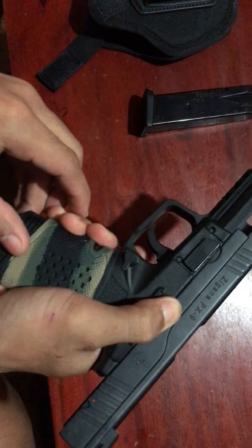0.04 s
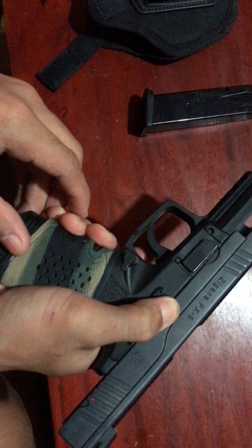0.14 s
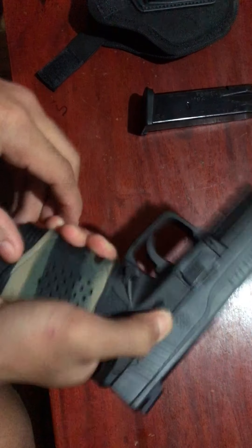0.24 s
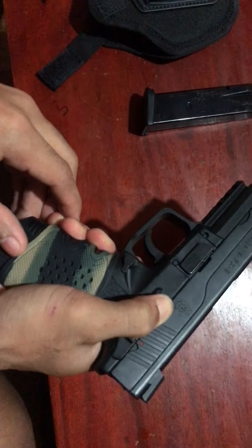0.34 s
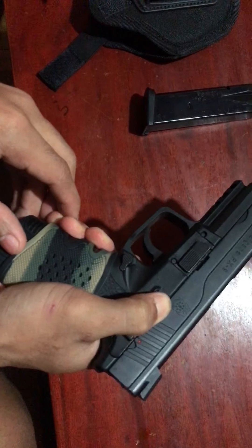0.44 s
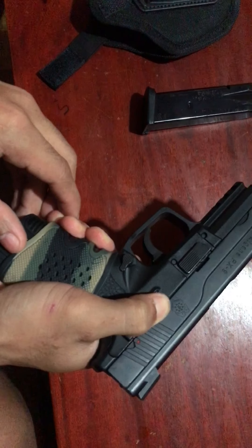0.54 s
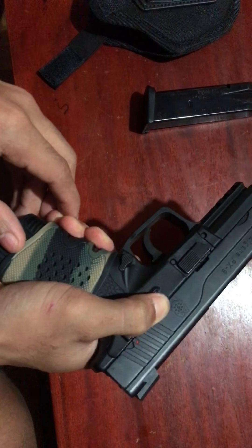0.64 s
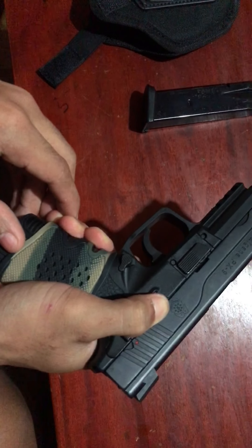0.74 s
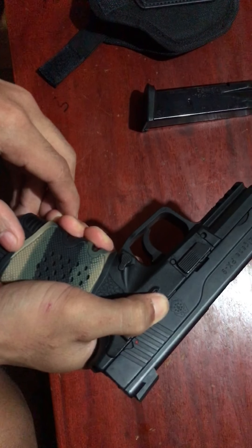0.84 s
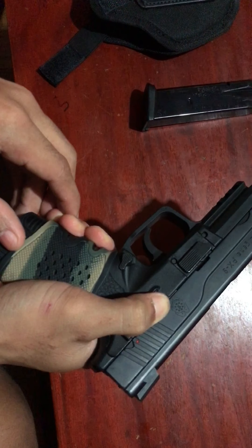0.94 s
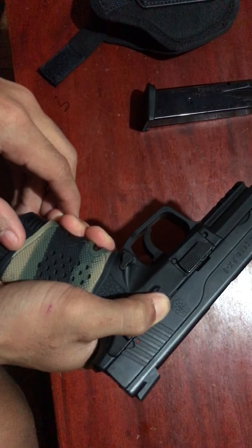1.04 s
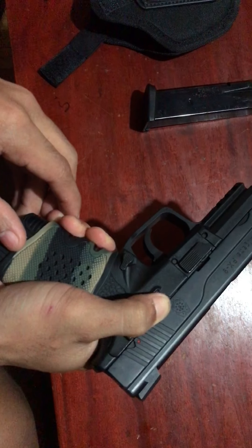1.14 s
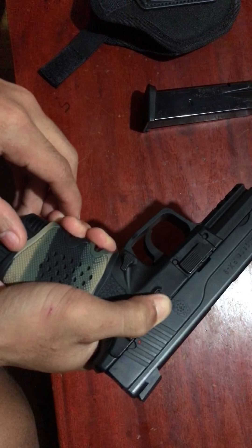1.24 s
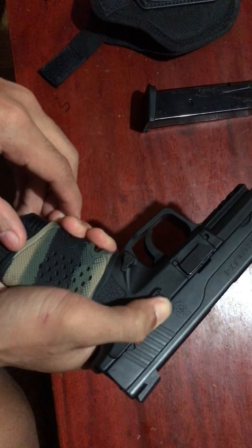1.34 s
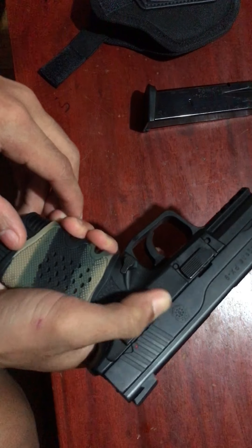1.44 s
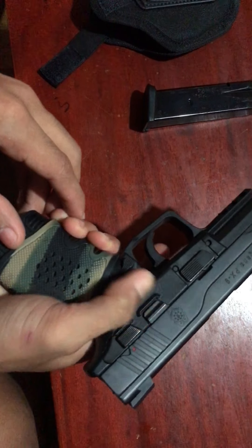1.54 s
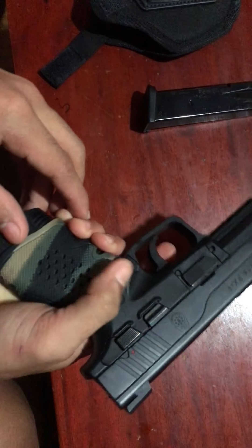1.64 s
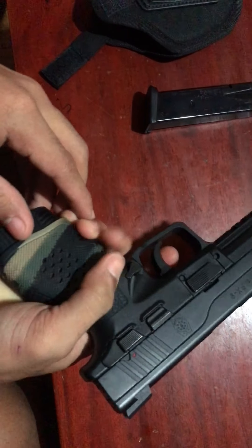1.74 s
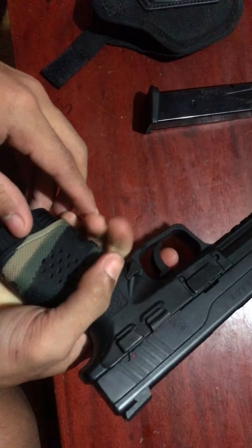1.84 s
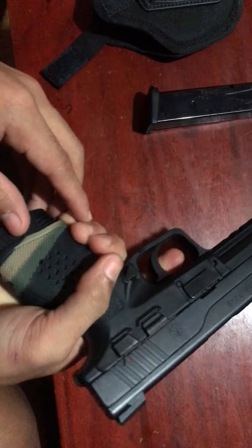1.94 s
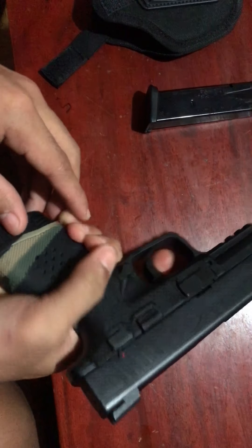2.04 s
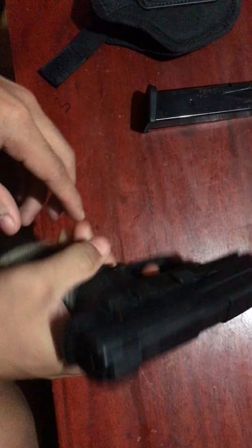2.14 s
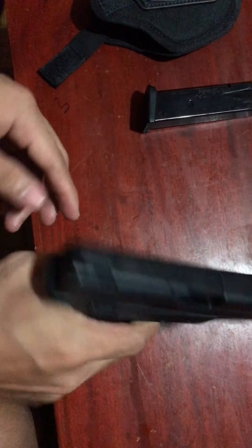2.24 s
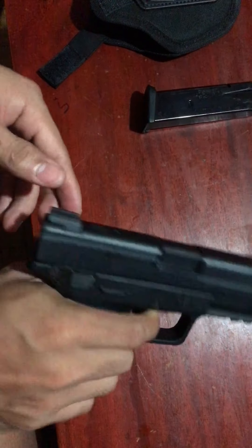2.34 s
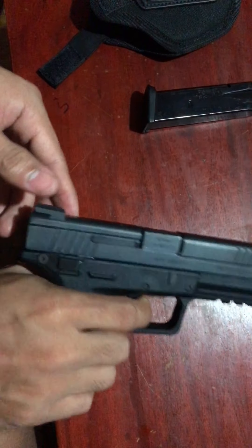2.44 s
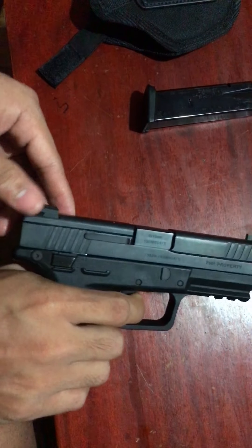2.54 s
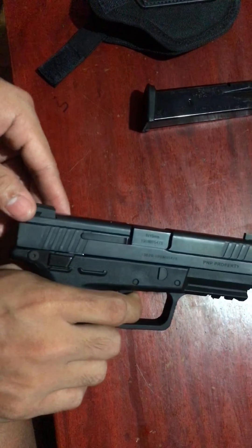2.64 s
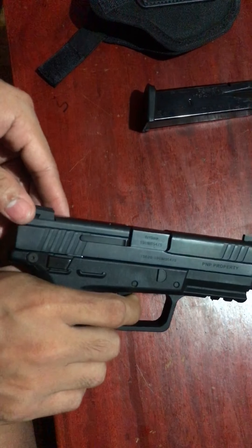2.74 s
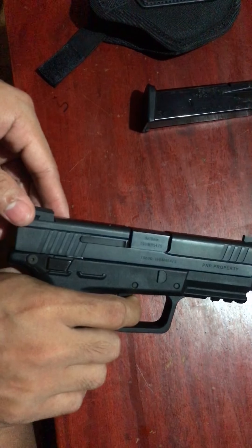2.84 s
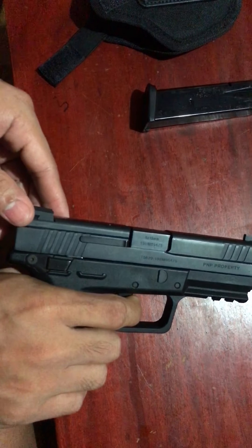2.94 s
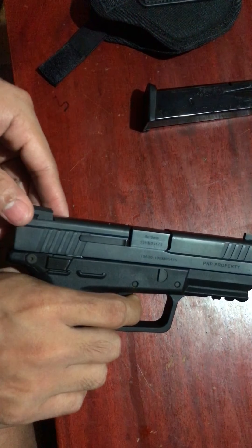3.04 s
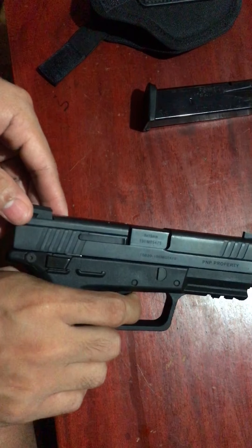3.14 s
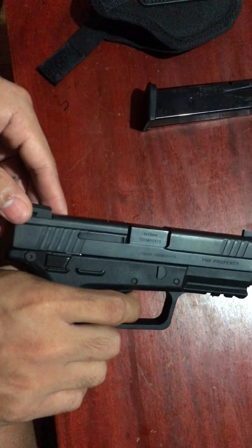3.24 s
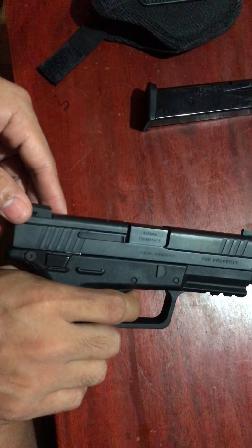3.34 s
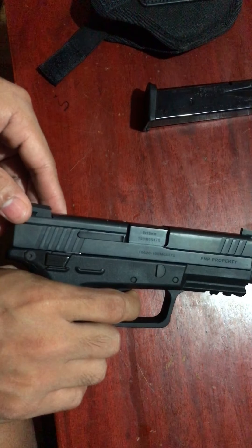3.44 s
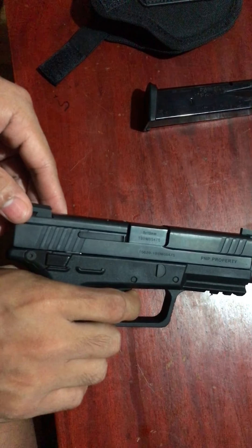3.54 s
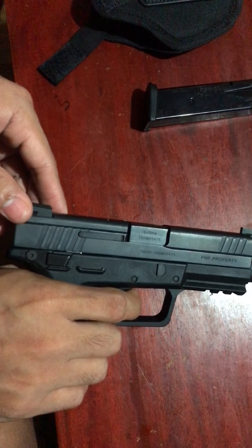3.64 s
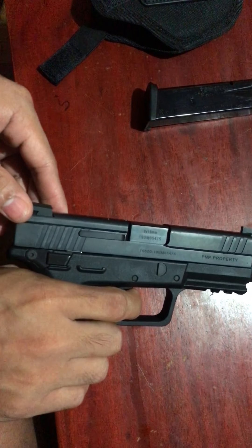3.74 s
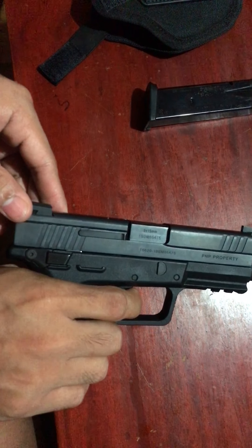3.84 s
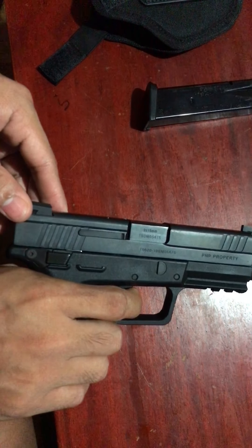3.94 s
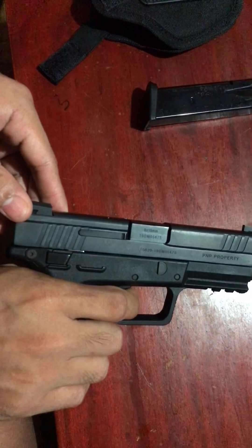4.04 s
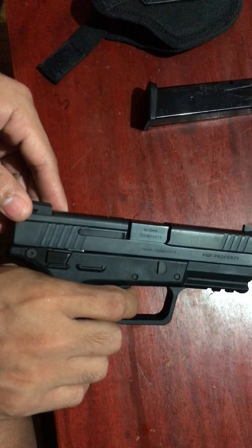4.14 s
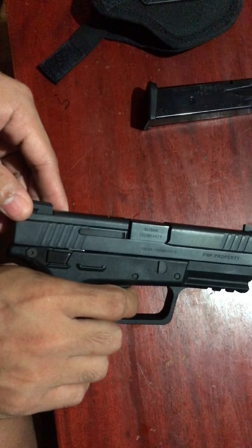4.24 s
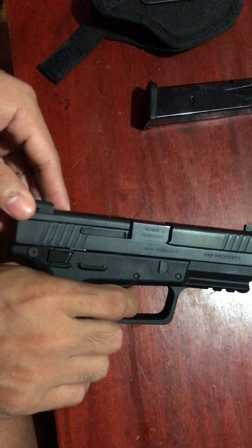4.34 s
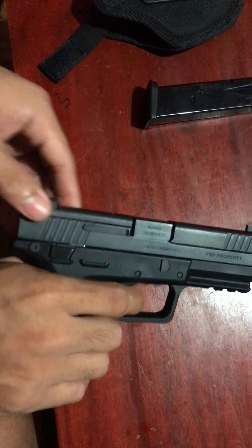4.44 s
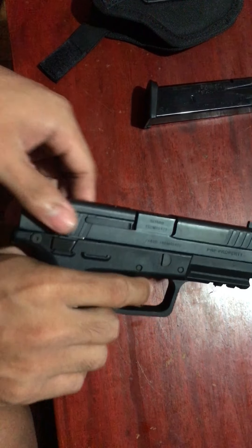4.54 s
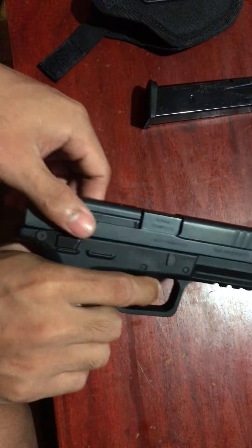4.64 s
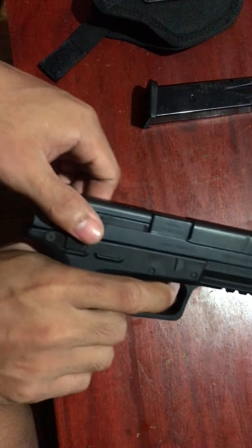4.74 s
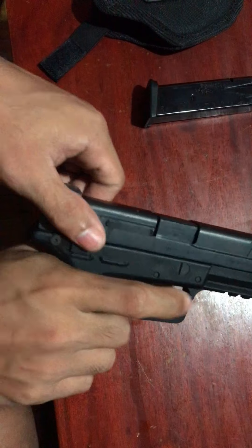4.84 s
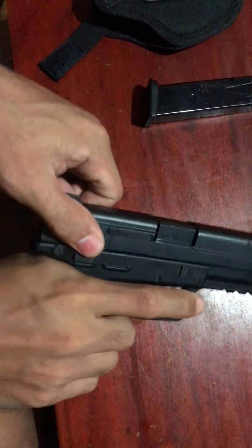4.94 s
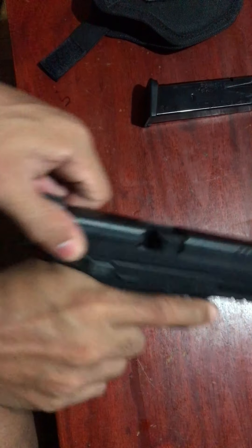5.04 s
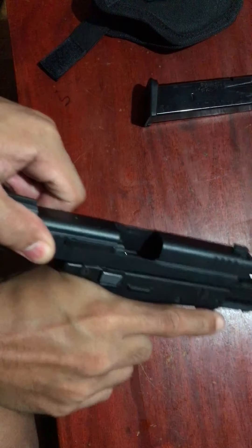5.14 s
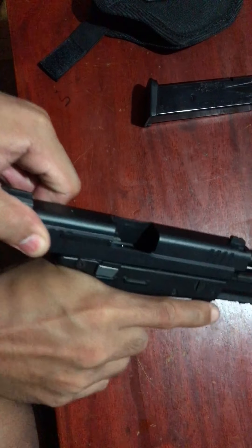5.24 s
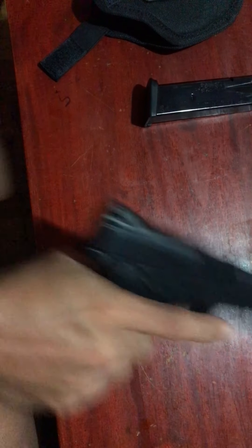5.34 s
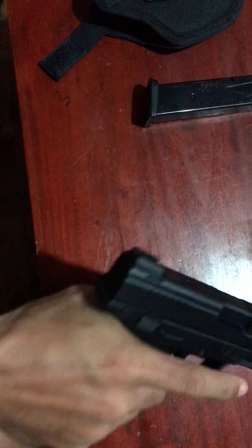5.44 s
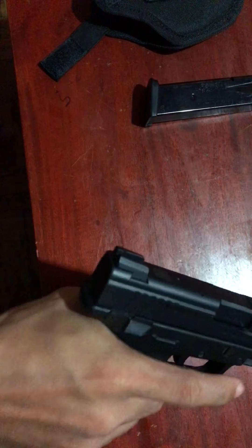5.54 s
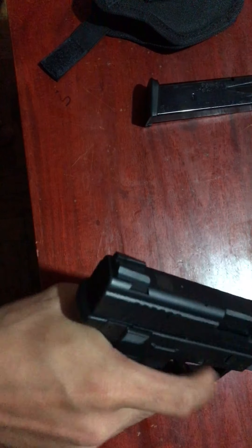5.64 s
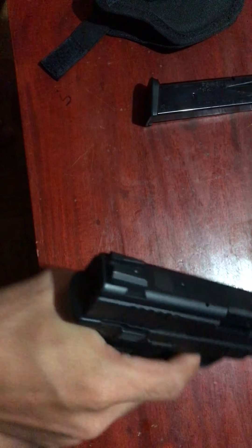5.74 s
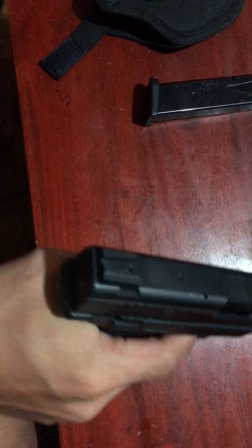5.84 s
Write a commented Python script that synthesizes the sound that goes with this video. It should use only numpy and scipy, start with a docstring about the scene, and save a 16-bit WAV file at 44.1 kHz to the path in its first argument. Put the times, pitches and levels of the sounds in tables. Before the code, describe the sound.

A pistol slide slams shut with a loud metallic clack, later a dry-fire click and hand racking, over fan hum and rumbling microphone buffeting.

```python
"""A steel pistol slide slams shut, is dry-fired and racked by hand over a wooden table, close to a phone.
Each metal blow is a burst of rattling noise plus ringing sine tones; rubbing, ticks and brushes are noise.
Knocks on the table are low, quickly fading tones with a dull rattle. A fan hums in the small room, and from
about the third second its draught buffets the microphone port, as rumbling noise and short swings.
The phone's gain control turns the sound down after each loud slam and lets it climb back."""
import sys
import numpy as np
from scipy import signal
from scipy.fft import rfft, irfft, next_fast_len
from scipy.io import wavfile
from scipy.ndimage import uniform_filter1d

SR = 44100
rng = np.random.default_rng(int(sys.argv[2]) if len(sys.argv) > 2 else 0)


def to_wav(sig):
    """Store sig (one row per channel, or 1-D mono) as 16-bit WAV at the path in sys.argv[1].

    Samples outside -1..1 are clipped; the rate is SR.
    """
    pcm = np.clip(np.atleast_2d(sig), -1, 1) * 32767
    pcm = np.round(pcm).astype(np.int16)
    wavfile.write(sys.argv[1], SR, pcm.T)  # frames by channels


N = 260190  # samples in the scene

# Fan motor and blades, slightly blurred tones: pitch_hz, width_hz, level_db
FAN_TONES = [(59.4, 3, -61.5), (121, 8, -74.5), (175, 10, -66), (238, 7, -59.5), (367.4, 8, -66.5),
             (634, 49, -68), (3797, 140, -68)]
# Swell of the lowest fan tone: time_s, gain_db
FAN_SWELL = [(1.2, -0.5), (1.6, 4), (2.6, 7.5), (3, 1.5)]
# Colour of the fan's air noise: pitch_hz, level_db (relative, per Hz)
AIR_COLOUR = [(20, -22.5), (40, -4.5), (100, -4), (300, -3), (470, -11.5), (630, -7.5), (1000, -3.5),
              (1700, -3), (2600, -10), (3400, -16.5), (4400, -20), (7000, -26), (10400, -33.5),
              (16000, -31)]
AIR_DB = -53.5  # middle level, before slow wavering

# Strength of the draught at the microphone port: time_s, level_db
DRAUGHT_LEVEL = [(2.93, -63), (2.97, -39.5), (3.31, -31), (3.46, -36), (3.63, -32.5), (3.69, -43.5),
                 (3.74, -30), (4.08, -35), (4.33, -33.5), (4.38, -53), (4.42, -35.5), (4.74, -44.5),
                 (4.81, -36), (5.04, -33.5), (5.28, -45.5), (5.55, -45), (5.72, -46.5), (5.9, -36)]
# Strongest eddies thudding on the port: middle_s, level_db
STRONG_EDDIES = [(3.116, -33.5), (3.194, -24.5), (3.217, -13), (3.276, -22.5), (3.301, -17), (3.364, -18.5),
                 (3.376, -21.5), (3.505, -24.5), (3.523, -22), (3.616, -18), (3.633, -10.5), (3.658, -20),
                 (3.737, -20), (3.757, -20), (3.788, -17.5), (3.839, -17.5), (3.868, -20.5), (3.927, -22),
                 (3.994, -21), (4.145, -18.5), (4.205, -19.5), (4.218, -19), (4.258, -20.5), (4.413, -26.5),
                 (4.454, -23.5), (4.519, -25.5), (4.643, -27.5), (4.794, -23.5), (4.916, -26),
                 (5.003, -25.5), (5.172, -26.5), (5.544, -31), (5.832, -28.5)]
# Colour of the slow rumble: pitch_hz, level_db (relative, per Hz)
RUMBLE_COLOUR = [(20, -31), (45, -2), (80, 1), (120, -9), (200, -21), (400, -77)]
# Colour of the small swirls: pitch_hz, level_db (relative, per Hz)
SWIRL_COLOUR = [(60, -10.5), (130, 5), (280, -11.5), (450, -16), (700, -34.5), (1400, -78)]
EDDY_HZ, EDDY_RISE, EDDY_SPREAD = 202, 0.0399, .3  # pitch at -24 dB; octaves up per dB; octaves of chance
SMALL_COUNT = 24  # weaker eddies at chance moments
SMALL_DB, SMALL_SPREAD_DB = 1, 0.5  # above the draught level; range of chance

# How long the room's reflections last: pitch_hz, t60_s (time to fall 60 dB)
ROOM_DECAY = [(1200, 0.17), (4000, 0.18), (9000, 0.1), (16000, 0.18)]

# The pistol knocks table and phone: start_s, level_db
TABLE_KNOCKS = [(0.246, -6), (0.365, -36.5), (5.342, -10.5)]
# Low tones of the table: pitch_hz, level_db (relative to the knock), t60_s, delay_s
TABLE_TONES = [(55, 3, 0.08, 0.0052), (146, -11, 0.08, 0)]
# Colour of the table top's dull rattle: pitch_hz, level_db (relative, per Hz)
BOARD_COLOUR = [(150, -20.5), (300, 0), (800, -4.5), (1100, -25)]
BOARDS_DB, BOARDS_T60 = -21, 0.18  # relative to the knock; seconds to fall 60 dB

# Metal hitting metal: start_s, level_db (relative), pitch_hz (part that rings most),
# decay_ms (rattle), ring_db (relative)
METAL_BLOWS = [(.2255, -25.5, 8000, 2.5, -10.5), (0.2307, 9, 4000, 3.2, -12), (0.2346, -1.5, 1770, 2.8, -5),
               (0.2439, 0, 3760, 10.5, -11), (0.2481, 9.5, 14200, 17, -12), (0.2526, 6, 1140, 7.1, -4),
               (0.2602, 5.5, 9600, 16.9, -11.5), (0.2816, -6, 9460, 7, 0.5), (4.0234, -34, 10800, 2.7, -16),
               (4.0355, -42, 8900, 2, -23), (4.0434, -14.5, 1110, 1.5, 4), (4.045, 3.5, 9900, 4.1, -11),
               (4.0513, 0, 4400, 2.95, -6.5), (4.0617, -12, 4400, 11, -9), (4.9954, -25.5, 8900, 2.8, -4.5),
               (4.9975, -20.5, 5700, 4.2, 3), (5.0187, -4, 5830, 2.5, -7.5), (5.0285, -8, 15650, 2.2, 2),
               (5.0309, 3.5, 6500, 2.7, -13), (5.0494, 7, 4000, 1.5, -16), (5.058, -12, 5900, 0.95, 5),
               (5.0643, -6.5, 6980, 2, -0.5), (5.111, -21, 5900, 3.6, 2.5), (5.118, -14, 1453, 3.7, -7.5),
               (5.306, -21.5, 3880, 2.7, 12.5), (5.3177, -24.5, 9050, 2.7, 2.5),
               (5.3358, -0.5, 2240, 8, -9.5), (5.3402, 10.5, 12500, 5.9, -13), (5.3458, -8, 1140, 4.4, 2.5),
               (5.354, 3, 14700, 9.7, -7.5), (5.363, -7.5, 8700, 24.3, -16)]
# Ringing modes of slide, barrel and frame: pitch_hz, level_db (relative), t60_s (slow part, not held)
STEEL_MODES = [(1150, 8, 0.088), (1730, -2, 0.059), (2292, -3.5, 0.043), (3100, -4.5, .05),
               (3880, -1, 0.034), (4330, -4.5, 0.051), (5900, 2, .16), (7000, 1, 0.098), (8420, -6.5, .07),
               (8980, -1, .16), (9280, -5, .33), (9590, -4.5, .2), (10950, -5, .06), (13240, -5, .06),
               (16460, -2, .05), (15650, -5, .15)]
# Colour of metal cracking and rubbing: pitch_hz, level_db (relative, per Hz)
CRACK_COLOUR = [(300, -42), (850, -20.5), (1020, -5.5), (2000, -0.5), (4300, -6), (5000, -8.5),
                (9500, -7.5), (10300, -18.5), (12500, -14.5), (16000, -12.5)]
# The slide rubs along its rails: start_s, end_s, start_level_db, end_level_db
RAIL_STROKES = [(0.202, 0.233, -69, -29.5), (5.018, 5.122, -54, -36.5), (5.291, 5.348, -57.5, -14)]
# Skin and cloth brush the grip: middle_s, length_s, level_db
GRIP_BRUSHES = [(1.603, 0.039, -67.5), (2.1, 0.062, -68.5), (3.332, 0.063, -75.5), (4.596, .12, -74)]
# Faint ticks as the hands shift on the pistol: start_s, level_db, pitch_hz (middle), width_octaves
HAND_TICKS = [(1.7602, -54, 5400, 1.3), (2.4516, -56, 6000, 1.4), (2.8163, -43, 3500, .9),
              (4.455, -42, 2100, .5), (4.523, -48, 1600, .7)]
# A thin tone as the spring takes load: middle_s, half_length_s, pitch_hz, level_db
SPRING_TONE = (4.96, .045, 1005, -45)
# A hand rests on the slide: start_s, end_s
HAND_ON_SLIDE = (1, 5.2)
TILT_DB = 2.5  # dB per octave of brightness, for each octave the struck part lies above 4 kHz
FRAME_DB = -13  # every blow shakes the frame, the lowest mode, at least this much
RADIATES_HZ = 946  # the small steel parts send little sound below this
TICK_MS = 4  # decay of a hand tick

MIC_LOW_HZ = 32  # bass limit of the microphone
EDGE_HZ = 15850  # pitch above which the sound holds no treble
CEILING = .86  # where peaks round off


def amp(db):
    """Turn decibels into a multiplier."""
    return 10 ** (np.asarray(db) / 20)


def evened(x):
    """Scale a sound to an average strength (rms) of 1."""
    return x / np.sqrt(np.mean(x ** 2) + 1e-20)


def read(points, hz):
    """Read a table between its pitches, on a logarithmic pitch scale."""
    point_hz, value = np.transpose(points)
    return np.interp(np.log(hz + 1), np.log(point_hz + 1), value)


def add(mix, s, sound):
    """Lay a sound into the mix, starting at s seconds."""
    part = mix[round(s * SR):][:len(sound)]
    part += sound[:len(part)]


def noise(colour_db, count=N):
    """Noise of rms 1; colour_db gives the level for each frequency."""
    size = next_fast_len(count)
    gain = amp(colour_db(np.fft.rfftfreq(size, 1 / SR)))
    spectrum = rfft(rng.standard_normal(size)) * gain
    return evened(irfft(spectrum, size)[:count])


def lumps(ms):
    """A random curve of rms 1, smoothed twice over ms milliseconds."""
    size = round(ms * SR / 1000)
    smooth = uniform_filter1d(rng.standard_normal(N), size)
    return evened(uniform_filter1d(smooth, size))


def fan():
    """Moving air makes broad noise; motor and blades make tones that waver."""
    t = np.arange(N) / SR
    out = amp(AIR_DB + 0.87 * lumps(60)) * noise(lambda f: read(AIR_COLOUR, f))
    swell = amp(np.interp(t, *np.transpose(FAN_SWELL)))
    for k, (hz, width, db) in enumerate(FAN_TONES):
        # slow complex noise blurs the tone to its width
        r = np.exp(-np.pi * width / SR)
        chance = rng.standard_normal(N) + 1j * rng.standard_normal(N)
        waver = signal.lfilter([1], [1, -r], chance)
        steady = 2.5 if k == 0 else .4  # the lowest tone wavers least, and swells
        tone = (steady * np.std(waver) + waver) * np.exp(2j * np.pi * hz * t)
        out += evened(tone.real) * amp(db) * (swell if k == 0 else 1)
    return out


def draught():
    """Turbulence makes a lumpy rumble; each eddy is a short swing with a kink, in a wake of small swirls."""
    level_db = np.interp(np.arange(N) / SR, *np.transpose(DRAUGHT_LEVEL), -120)
    rumble = evened(noise(lambda f: read(RUMBLE_COLOUR, f)) * amp(3.7 * lumps(7.7)))
    out = amp(level_db) * rumble

    # one weaker eddy at a chance moment in each equal slice of time
    when, size = rng.random((SMALL_COUNT, 2)).T
    first_s = DRAUGHT_LEVEL[0][0]
    small_s = first_s + (np.arange(SMALL_COUNT) + when) * (N / SR - first_s) / SMALL_COUNT
    small_db = np.interp(small_s, *np.transpose(DRAUGHT_LEVEL))
    small_db = small_db + SMALL_DB + SMALL_SPREAD_DB * (size - .5)
    eddies = STRONG_EDDIES + list(zip(small_s, small_db))

    wake, bump_s = np.zeros(N), np.arange(-1500, 1500) / SR
    for (s, db), chance in zip(eddies, rng.random((len(eddies), 3))):
        octaves = EDDY_RISE * (db + 24) + EDDY_SPREAD * (chance[2] - .5)
        hz = EDDY_HZ * 2 ** octaves
        turns = np.arange(-3, 3, hz / SR)
        swing = np.exp(-(turns / .7) ** 2) * np.cos(2 * np.pi * (turns + chance[0]))
        kink = np.exp(-(turns / 0.34) ** 2) * np.cos(2 * np.pi * (1.826 * turns + chance[1]))
        kink_db = -6.0 + 0.14 * (db + 20.0)  # strong eddies are sharper
        add(out, s - 3 / hz, amp(db) * (swing + amp(kink_db) * kink))
        add(wake, s + bump_s[0], amp(db - 15) * np.exp(-(bump_s / 0.015) ** 2))
    swirls = evened(noise(lambda f: read(SWIRL_COLOUR, f)) * amp(3.7 * lumps(3.7)))
    return out + (wake + amp(level_db - 4.5)) * swirls


def room(x):
    """Dense reflections, each band dying at its own speed, over a faint slower tail."""
    taps = rng.standard_normal(SR // 2)
    taps[:130] = 0  # a short gap before the reflections
    hz, t, bands = signal.stft(taps, SR, nperseg=128)
    decay_db = -60 * t / read(ROOM_DECAY, hz)[:, None]
    late_db = -27 - 60 * t / .4
    tail = signal.istft(bands * (amp(decay_db) + amp(late_db)), SR, nperseg=128)[1]
    return signal.fftconvolve(x, tail / np.linalg.norm(tail))[:N]


def table():
    """A knocked table gives low, damped tones with a soft start, and a dull rattle."""
    out, t = np.zeros(N), np.arange(9000) / SR
    soft_start = np.minimum(t / 0.0014, 1)
    for s, db in TABLE_KNOCKS:
        boards = noise(lambda f: read(BOARD_COLOUR, f), count=len(t)) * soft_start
        add(out, s, amp(db + BOARDS_DB - 60 * t / BOARDS_T60) * boards)
        for hz, mode_db, t60, later in TABLE_TONES:
            tone = np.sin(2 * np.pi * hz * t) * soft_start
            add(out, s + later, -amp(db + mode_db - 60 * t / t60) * tone)
    return out


def tick(db, hz, octaves):
    """A shifting hand makes a short damped click of noise with a soft start."""
    t = np.arange(1500) / SR
    click = noise(lambda f: -8.7 * (np.log2((f + 1) / hz) / octaves) ** 2, count=len(t))
    return amp(db) * click * np.exp(-t * 1000 / TICK_MS) * np.minimum(t / .001, 1)


def steel_colour(hz, near_hz, tilt_db):
    """Damped by the hand, each mode is a broad hump on the crack, raised near the struck part."""
    mode_hz, db, _ = np.transpose(STEEL_MODES)[:, :, None]
    hump_width = 60 + 0.0076 * mode_hz
    humps = (amp(db + 5.0) / (1 + ((hz - mode_hz) / hump_width) ** 2)).max(0)
    octaves = np.log2(np.maximum(hz, 1000)) - np.log2([[near_hz], [4000]])
    near_db = 6 * np.exp(-(octaves[0] / .45) ** 2)
    return read(CRACK_COLOUR, hz) + 20 * np.log10(1 + humps) + near_db + tilt_db * octaves[1]


def blow(s, level_db, near_hz, ms, ring_db):
    """A grainy rattle of parts, and the modes near the struck part ringing on unevenly."""
    held = HAND_ON_SLIDE[0] < s < HAND_ON_SLIDE[1]
    t = np.arange(7200 if held else 14000) / SR
    grain = amp(3.2 * evened(uniform_filter1d(rng.standard_normal(len(t)), 14)))
    tilt_db = TILT_DB * np.log2(near_hz / 4000)
    rattle = noise(lambda f: steel_colour(f, near_hz, tilt_db), count=len(t))
    rattle *= grain * np.exp(-t * 1000 / ms) * np.minimum(t / 0.00025, 1)

    hz, db, t60 = np.transpose(STEEL_MODES)[:, :, None]
    t60 = t60 * (.6 if held else 1)
    slow = t[::40]  # slow changes are worked out every 40 samples
    # loose parts blur each pitch: a random start, then a random walk
    walk = np.cumsum(rng.standard_normal((len(hz), len(slow))), 1)
    stray = rng.random(hz.shape) + .0016 * np.sqrt(hz) * walk
    turns = (hz * t + stray.repeat(40, 1)) % 1
    share_db = db - np.minimum(40 * abs(np.log2(hz / near_hz)), 20.5)
    share_db[0] = max(share_db[0, 0], FRAME_DB - ring_db)
    # the grip damps most at once; a weaker part rings longer
    decay = amp(share_db - 200 * slow / t60) + amp(share_db - 15 - 60 * slow / t60)
    ring = (decay.repeat(40, 1) * np.sin(2 * np.pi * turns.astype(np.float32))).sum(0)
    ring *= np.minimum(t / 0.0002, 1) * np.minimum((t[-1] - t) / .05, 1)
    return amp(level_db) * (0.32 * rattle + 0.26 * amp(ring_db) * ring)


def pistol():
    """Steel parts strike and rub, hands tick and brush, and the spring sings thinly."""
    out, t = np.zeros(N), np.arange(N) / SR
    for row in METAL_BLOWS:
        add(out, row[0], blow(*row))
    for s, *row in HAND_TICKS:
        add(out, s, tick(*row))
    rub = evened(noise(lambda f: read(CRACK_COLOUR, f)) * amp(4.4 * lumps(0.4)))
    for start, end, start_db, end_db in RAIL_STROKES:
        out += rub * amp(np.interp(t, [start, end], [start_db, end_db], -200, -200))
    brush = noise(lambda f: read([(2000, -31.0), (9000, 1)], f))
    for s, length, db in GRIP_BRUSHES:
        out += brush * amp(db) * np.exp(-((t - s) / (length / 2)) ** 2)
    s, half, hz, db = SPRING_TONE
    return out + amp(db) * np.exp(-((t - s) / half) ** 4) * np.sin(2 * np.pi * hz * t)


def scene():
    """Mix the pistol and its room reflections with table, draught and fan."""
    radiation = signal.butter(4, RADIATES_HZ, "high", fs=SR, output="sos")
    steel = signal.sosfilt(radiation, pistol())
    return (steel + amp(-8.0) * room(steel) + table() + draught() + fan())[None]


def record(dry):
    """Gain control falls after loud sound and climbs back; deep bass is cut, peaks round off, top treble goes."""
    power = signal.lfilter([.0012], [1, -.9988], dry[0] ** 2)
    power_db = 10 * np.log10(power + 1e-12)
    # remember the loudest power, letting the memory sink by 30 dB a second
    sink_db = np.arange(N) * 30.0 / SR
    memory_db = np.maximum.accumulate(power_db + sink_db) - sink_db
    over_db = np.maximum(memory_db + 24.0, 0)
    # the average over the last 1200 samples makes the gain fall late
    ducked = dry / amp(0.55 * uniform_filter1d(over_db, 1200, origin=599))
    bass_cut = signal.butter(2, MIC_LOW_HZ, "high", fs=SR, output="sos")
    ducked = signal.sosfilt(bass_cut, ducked)
    rounded = CEILING * np.tanh(ducked / CEILING)
    edge = signal.firwin(401, EDGE_HZ, window=("kaiser", 9), fs=SR)
    return signal.oaconvolve(rounded, edge[None], "same")


dry = scene()
out = record(dry)
to_wav(out)
```